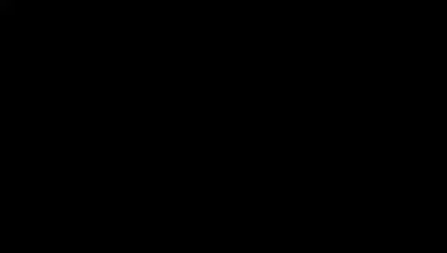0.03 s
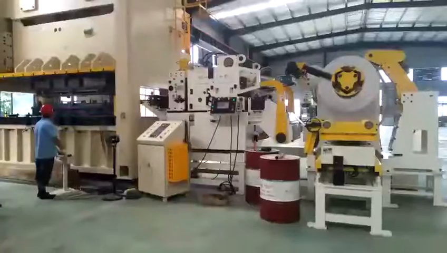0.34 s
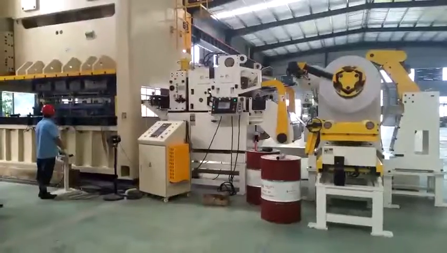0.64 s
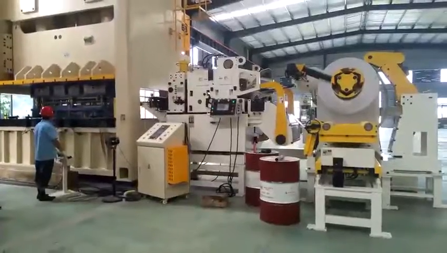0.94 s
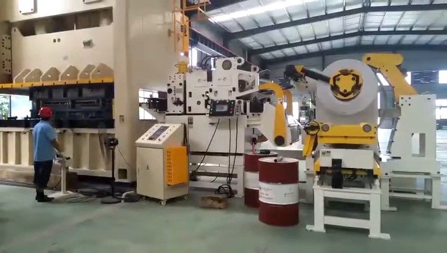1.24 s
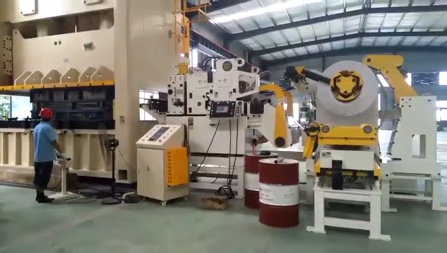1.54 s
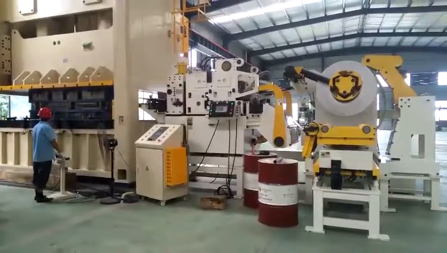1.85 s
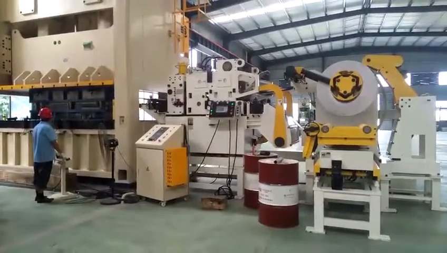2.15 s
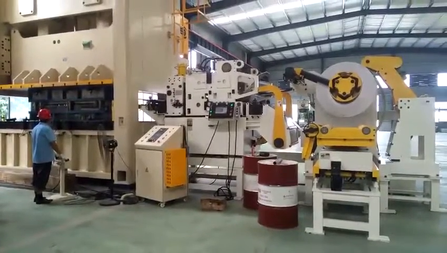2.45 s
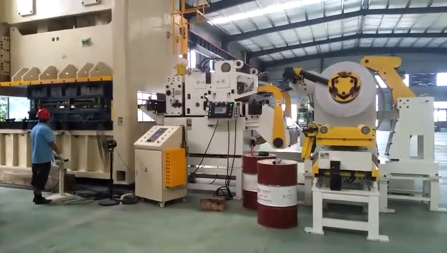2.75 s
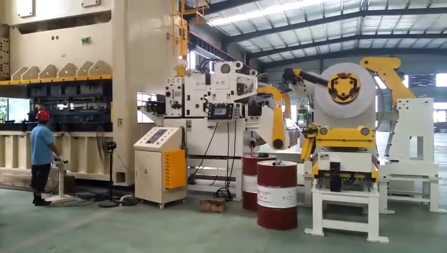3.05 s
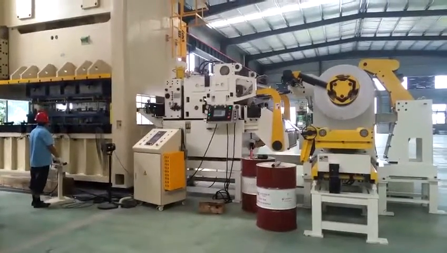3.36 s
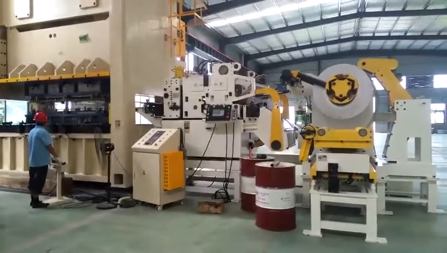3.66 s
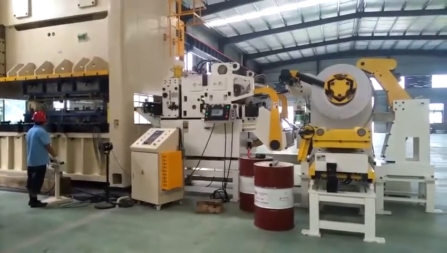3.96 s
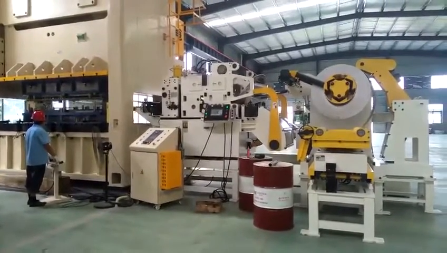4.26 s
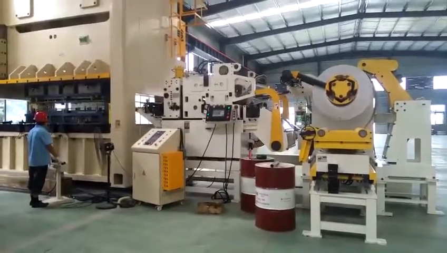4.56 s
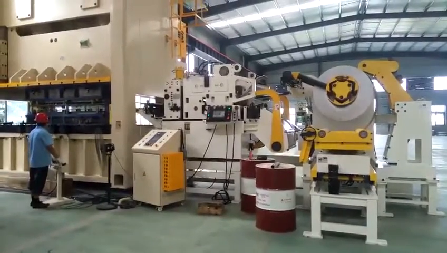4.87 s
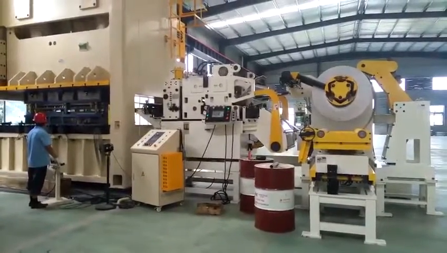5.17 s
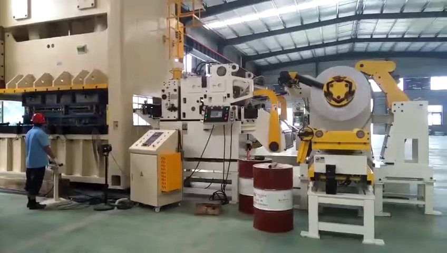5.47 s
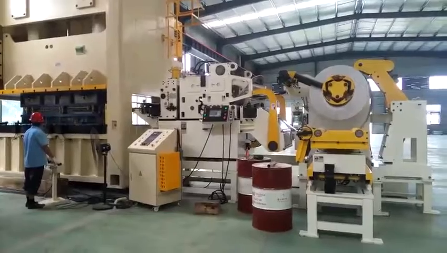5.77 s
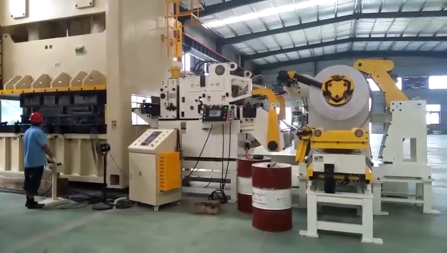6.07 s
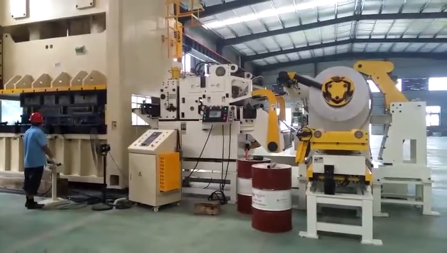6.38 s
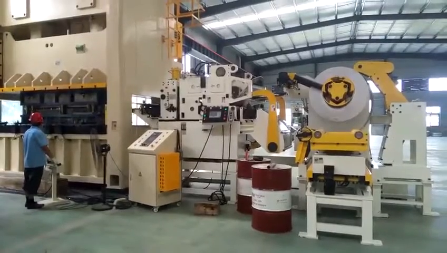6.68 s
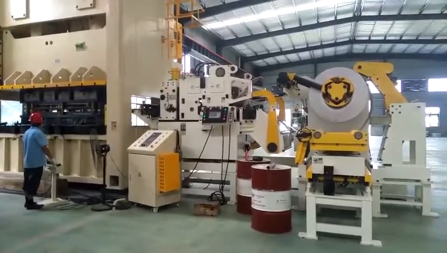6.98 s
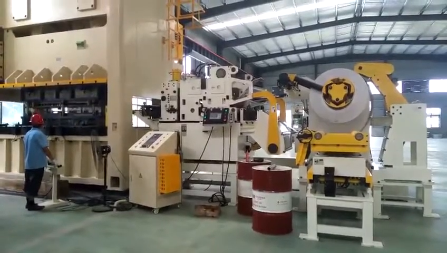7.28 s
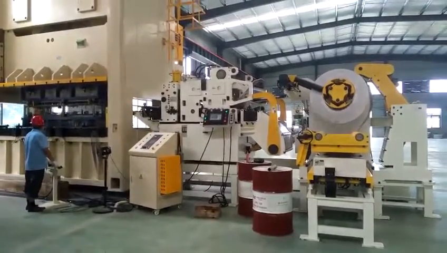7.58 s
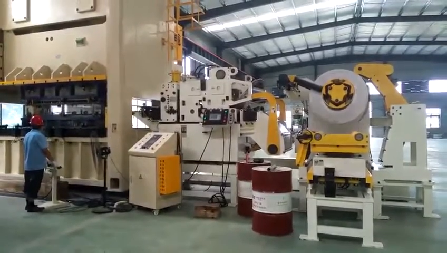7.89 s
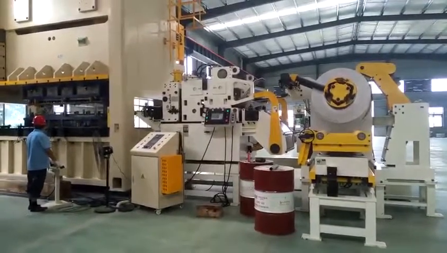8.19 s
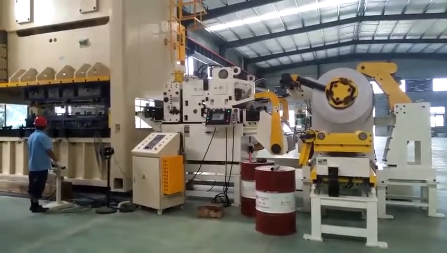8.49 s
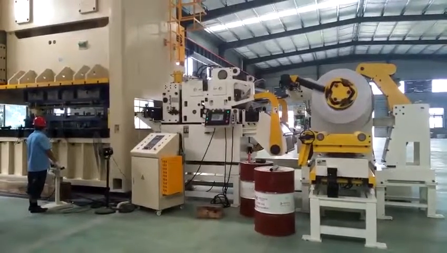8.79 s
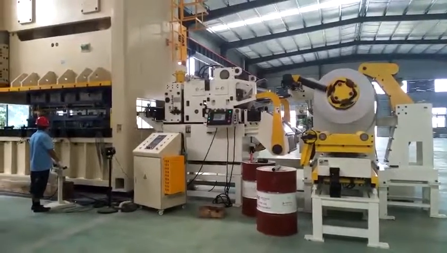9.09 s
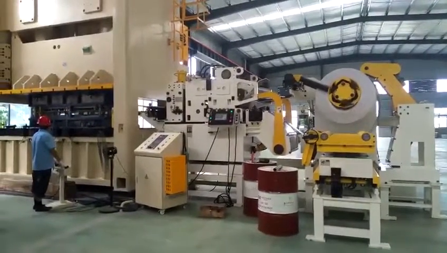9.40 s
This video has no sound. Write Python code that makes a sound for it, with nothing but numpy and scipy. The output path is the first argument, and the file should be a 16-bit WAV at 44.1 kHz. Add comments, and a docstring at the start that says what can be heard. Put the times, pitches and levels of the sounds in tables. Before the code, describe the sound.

A large metal stamping press makes two strokes, crashing and thumping with air hisses over steady fan noise in an echoing factory hall.

```python
"""A factory hall, with a small microphone on a large stamping press, nearest to its strip feeder.
Fans, motors and an inverter run throughout; farther off, another machine swishes. The press makes two
strokes: air valves blow, the clutch knocks in, the die crashes shut and shakes the frame, and the feeder
rattles new steel strip in before the brake bites. The hall rings on; the crashes overload the microphone."""
import sys
import numpy as np
from scipy import signal
from scipy.fft import rfft, irfft, next_fast_len
from scipy.io import wavfile
from scipy.ndimage import uniform_filter1d, map_coordinates

SR = 44100
rng = np.random.default_rng(int(sys.argv[2]) if len(sys.argv) > 2 else 0)


def int16_out(signal):
    """Quantize to a 16-bit WAV file."""
    q = np.round(np.clip(np.atleast_2d(signal).T, -1, 1) * 32767)
    wavfile.write(sys.argv[1], SR, q.astype(np.int16))


N = 416744
T = np.arange(N) / SR

# Levels are relative. Ventilation spectrum: f/Hz, level/dB
FAN_SPECTRUM = [(20, -55), (40, -25), (60, -1.5), (100, -4), (190, 1), (300, -7), (430, -4), (650, -10.5),
                (950, -14), (1400, -13.5), (2200, -16), (3200, -22.5), (5000, -26), (6200, -27.5),
                (7000, -70), (9000, -70), (11000, -89)]
# motor hum: f/Hz, level/dB
MOTOR_LINES = [(129.2, -55), (414.5, -57), (551, -59.5), (1378, -64)]
# inverter lines: f/Hz, level halfway through/dB, slope/(dB/s)
INVERTER_LINES = [(5458, -68, 0.3), (5543, -67, 0), (5935, -55.5, 0.7), (5981, -67, 0), (6024, -65, 0.3),
                  (6066, -56.5, -1)]
# far machine's swishes: t/s, level/dB, ring f/Hz, ring level/dB
FAR_SWISHES = [(.16, -50, 1378, -59), (.53, -50, 1378, -54), (.89, -52, 1126, -56),
               (3.78, -45.5, 1378, -56), (4.201, -50, 2165, -57), (4.545, -52, 1292, -50.5),
               (4.92, -58, 1787, -62), (8.13, -48, 2153, -60), (8.52, -52.5, 1277, -55),
               (8.92, -50.5, 2110, -59), (9.31, -50.5, 1780, -52.5)]
# their spectrum: f/Hz, level/dB
FAR_SPECTRUM = [(300, 0), (900, 1.5), (1400, -7), (2100, -4.5), (3000, -5), (4100, -2), (5500, -5),
                (6500, -28), (8000, -36)]
# far machine's metal: f/Hz, width/Hz, level/dB
FAR_MODES = [(1083, 40, -4), (1246, 45, -1.5), (1365, 60, -4), (1560, 40, -8), (1730, 45, -5),
             (2110, 45, -3), (4000, 240, -13.5), (4330, 260, -15)]
# press cycles: die meets sheet t/s, feed level/dB, feed run-down t60/s, feed treble rise/s
PRESS_STROKES = [(1.532, -18.5, 0.95, 0.27), (5.786, -21, 0.75, 0.34)]
# clutch air through its silencer: f/Hz, level/dB
SILENCER_SPECTRUM = [(200, 6), (550, 5), (680, 13.5), (850, 7.5), (1500, 9), (2200, 8), (3200, -0.5),
                     (4200, 2), (5600, -1.5), (7000, -12), (8000, -22), (9400, -20), (10500, -50)]
# clamp and brake valves blowing off: t/s, level/dB, rise/s, hold/s, t60/s
BLOW_OFFS = [(1.21, -30, 0.055, 0.08, 2.8), (5.475, -22, 0.059, 0.059, 2.1),
             (2.783, -27, 0.095, 0.049, 0.72), (7.04, -26.5, 0.025, 0.11, 0.67),
             (7.19, -29, 0.025, 0.05, 0.34)]
# open exhaust: f/Hz, level/dB
JET_SPECTRUM = [(200, 0), (550, 7.5), (680, 15), (850, 8.5), (1400, 11), (2200, 6.5), (3200, -0.5),
                (4200, 3.5), (5200, 4), (6000, 1), (7000, -9.5), (8000, -21.5), (9400, -16.5), (10500, -48)]
# brake line bleeding: t/s, level/dB, rise/s, hold/s, t60/s
BRAKE_BLEEDS = [(2.53, -34.5, 0.043, 0.41, 7.8), (6.752, -40.5, 0.063, 1, 3.6)]
# its hiss: f/Hz, level/dB
BLEED_SPECTRUM = [(200, 1.5), (550, 6), (680, 14.5), (850, 10), (1400, 9), (2200, 4), (3200, 2),
                  (4200, 2.5), (5600, 2.5), (7000, -4.5), (8000, -23), (9400, -12), (10500, -51)]
# clutch valve body: f/Hz, level/dB
VALVE_MODES = [(680, -4), (1450, -1), (1750, -2), (2150, 0), (2350, -3), (4100, -7), (5200, -8)]
# gears knocking as the clutch engages: t/s, level/dB
GEAR_KNOCKS = [(1.158, -30), (1.185, -33), (5.418, -30), (5.441, -31)]
# press frame: f/Hz, level/dB, t60/s
FRAME_MODES = [(56.2, -5, 0.99), (66.5, -3, 0.25), (79.2, 1.5, 0.35), (99.4, -5, 0.4), (123.3, 0, 0.51),
               (154.1, -4, 1.6), (190.4, 1.5, 0.54), (221.2, 6, 1.06), (257, -14.5, 0.68), (371.5, -4, 0.6)]
# booming panels: f/Hz, level/dB
PANEL_SPECTRUM = [(20, -13), (45, -19), (65, 0), (105, 1.5), (150, 2), (220, 0.5), (280, -1.5), (380, -4),
                  (480, -9), (700, -17.5), (1100, -22.5), (3000, -42), (9000, -87)]
# clanking tooling: f/Hz, level/dB
CLANK_SPECTRUM = [(100, -19.5), (400, -5), (700, 5), (1100, 1), (2200, -5), (3000, -13.5), (5000, -14),
                  (7000, -24.5), (8200, -44), (12000, -70)]
# ringing steel blocks: f/Hz, level/dB
TOOLING_MODES = [(363, 0), (417, 1), (565, -5), (635, 1), (700, -14), (955, -9), (1215, -11), (1457, -2),
                 (1725, 0), (1885, -6), (2260, -15)]
# feeder clamp gripping the strip: t/s, level/dB
CLAMP_GRIPS = [(1.221, -20), (5.475, -22), (5.566, -23.5)]
# clamp jaw: f/Hz, level/dB
JAW_MODES = [(620, -3), (860, -2), (1090, -1), (1400, -2), (1830, -3), (2150, -7)]
# strip squeaking in the clamp: t/s, f/Hz, level/dB, hold/s
STRIP_SQUEAKS = [(1.23, 4880, -42, 0.008), (1.259, 5000, -38, 0.015), (1.289, 4900, -33.5, 0.032),
                 (6.672, 4950, -34, 0.028), (6.754, 4973, -36, 0.008)]
# modes of a squeak: pitch ratio, level/dB
SQUEAK_MODES = [(1, -2), (0.8, -12), (0.7, -10)]
# ram setting off and climbing back: t/s from die contact, level/dB, thud f/Hz
RAM_JOLTS = [(-.24, -22.5, 51.7), (.455, -14, 111), (.6, -24, 75), (.7, -23, 171), (.86, -28, 84)]
# die stations striking in turn: t/s, crash/dB, thud/dB, block f/Hz, block ring/dB, snap/dB
DIE_PUNCHES = [(1.532, -14, -9, 2150, -19.5, -36.5), (1.578, -16.5, -13, 402, -14.5, -45),
               (1.616, -21, -18, 358, -10.5, -49), (1.659, -20.5, -21, 1850, -24.5, -59),
               (1.738, -15, -10, 617, -16.5, -42), (1.768, -18.5, -17, 689, -12, -33.5),
               (1.813, -17, -10, 1100, -28, -38.5), (1.878, -17, -26, 415, -21, -46),
               (1.916, -19.5, -12.5, 945, -18, -51), (1.937, -20, -19, 539.6, -13, -56),
               (5.786, -14.5, -8.5, 2224, -22.5, -35), (5.841, -18, -14, 404.5, -10.5, -46),
               (5.880, -18, -19.5, 356.7, -6.5, -41), (5.914, -20.5, -21.5, 1620, -25, -54),
               (5.940, -25, -18, 559, -17, -60), (5.992, -16, -9, 612, -13, -36),
               (6.018, -17.5, -16, 699, -13.5, -44), (6.040, -19.5, -18, 910, -23, -44),
               (6.069, -19, -7.5, 427, -20, -40), (6.112, -22, -20.5, 396, -21, -46),
               (6.140, -18, -22, 1875, -17.5, -48), (6.176, -18, -23, 568, -16, -59)]
# sheet breaking under a punch: f/Hz, level/dB
SNAP_SPECTRUM = [(1000, -34), (5000, -3.5), (8000, 2.5), (11500, -2), (12400, -9.5)]
# scraping sheet: f/Hz, level/dB
SCRAPE_SPECTRUM = [(200, -31.5), (600, -7), (1000, 13.5), (1450, 8), (2100, 1), (2900, 9.5), (4000, 7),
                   (5000, 3), (6200, 1.5), (8200, -19), (10000, -38), (12000, -69)]
# steel strip: f/Hz, width/Hz, level/dB
STRIP_MODES = [(1446, 130, 4), (2110, 340, 1.5), (2550, 140, -20), (3990, 270, -3), (4400, 220, -6.5),
               (5340, 470, -7), (5750, 300, -17)]
# rolls and guides: f/Hz, level/dB
ROLL_MODES = [(1222, -3.5), (1384, 1), (1460, 1.5), (1561, 1.5), (1865, -1.5), (1981, -1.5), (2062, 0.5),
              (2546, -4.5), (2686, -4.5), (3729, -6), (3881, -11.5), (3984, -6.5), (4102, -10.5),
              (4355, -9), (4540, -9)]
# strip slapping its guides: t/s, ring/dB, snap/dB
STRIP_SLAPS = [(1.986, -21, -42), (2.022, -22.5, -50), (2.115, -20, -38), (2.138, -22, -33.5),
               (2.285, -26, -42.5), (6.213, -26, -54), (6.238, -24, -44), (6.28, -16, -40),
               (6.344, -22, -46), (6.405, -22, -51)]
# brake ending each stroke: t/s, level/dB
BRAKE_BITES = [(2.531, -18.2), (6.750, -20.3)]
# bite, lock and rock-back: t/s after the bite, level/dB over the bite
BRAKE_KNOCKS = [(0, 0), (.056, -3.5), (.25, -14)]
# hall decay: f/Hz, t60/s
HALL_DECAY = [(60, 1.76), (170, 5.47), (500, 3.95), (1500, 2.36), (5000, 3.4), (9000, 2.07), (12000, 0.29)]
# microphone response: f/Hz, level/dB
MIC_RESPONSE = [(20, -2), (60, 0.5), (500, 1), (900, -1), (1500, 1.5), (2100, 2.5), (3000, -0.5),
                (4100, 4.5), (6100, 3), (7000, 1), (8000, -2.5), (11000, -8), (12400, -16)]


def amp(db):
    """Decibels to gain."""
    return 10 ** (np.asarray(db) / 20)


def unit(x):
    """Scale to rms 1."""
    return x / np.sqrt(np.mean(x ** 2) + 1e-20)


def along(points, hz):
    """Read (f/Hz, value) points on a log axis."""
    f, v = np.transpose(points)
    return np.interp(np.log(hz + 1), np.log(f + 1), v)


def fade(t, t60):
    """Exponential decay, 60 dB down at t60."""
    return np.exp(-np.log(1000) * t / np.maximum(t60, 1e-3))


def swell(s, db, rise_s, hold_s, t60):
    """An envelope from time s: straight rise, hold, exponential release."""
    return amp(db) * np.clip((T - s) / rise_s, 0, 1) * fade(np.maximum(T - s - rise_s - hold_s, 0), t60)


def wobble(rate):
    """A smooth random curve, rate knots a second."""
    return map_coordinates(rng.standard_normal(int(N * rate / SR) + 4), [T * rate], order=2)


def sine(t, hz):
    """A sine at a random phase."""
    return np.sin(2 * np.pi * (hz * t + rng.random(np.shape(hz))))


def filtered(x, response):
    """Filter x by a gain given as a function of frequency."""
    size = next_fast_len(len(x) + SR // 2, True)
    return irfft(rfft(x, size) * response(np.fft.rfftfreq(size, 1 / SR)), size)[:len(x)]


def noise(spectrum, size=N):
    """Coloured noise of rms 1."""
    return unit(filtered(rng.standard_normal(size), lambda hz: amp(along(spectrum, hz))))


def resonances(modes, hz):
    """Gain of a set of resonances: f/Hz, width/Hz, level/dB."""
    return np.sqrt(sum(amp(db) ** 2 / (1 + (2 * (hz - f) / width) ** 2) for f, width, db in modes))


def add(track, s, sound):
    """Mix a sound into the track at time s."""
    part = track[round(s * SR):][:len(sound)]
    part += sound[:len(part)]


def ventilation(db=-41):
    """The fans' rush of air fills the hall, its level barely moving."""
    return amp(db + 0.48 * wobble(2.2) + 0.76 * wobble(12)) * noise(FAN_SPECTRUM)


def hum(lines, unsteady_db, drift_rad):
    """A drive's steady lines waver on their way across the hall to the microphone."""
    return np.sqrt(2) * sum(amp(db + unsteady_db * wobble(7))
                            * np.sin(2 * np.pi * hz * T + drift_rad * wobble(7)) for hz, db in lines)


def inverter(blur_hz=6110, width_hz=190):
    """The switching lines slowly trade strength, blurred by the changing motor load."""
    blur = filtered(rng.standard_normal(N), lambda hz: np.exp(-.5 * ((hz - blur_hz) / width_hz) ** 2))
    lines = [(hz, db + slope * (T - T.mean())) for hz, db, slope in INVERTER_LINES]
    return amp(-5.5) * hum(lines, unsteady_db=0.5, drift_rad=1.06) + amp(-64) * unit(blur)


def far_machine(swish_s=0.083, jingle_db=2.3):
    """Far from the microphone a machine swishes; each rub rings its metal and makes one mode sing."""
    rub = lambda s: np.exp(-.5 * ((T - s) / swish_s) ** 2)
    envelope = sum(amp(db) * rub(s) for s, db, *_ in FAR_SWISHES)
    metal = unit(filtered(noise(FAR_SPECTRUM), lambda hz: resonances(FAR_MODES, hz)))
    swishes = envelope * amp(jingle_db * wobble(50)) * (amp(-3.5) * noise(FAR_SPECTRUM) + metal)
    drift = 1.2 * wobble(45)
    singing = sum(amp(db) * rub(s) * np.sin(2 * np.pi * hz * T + drift) for s, _, hz, db in FAR_SWISHES)
    return swishes + np.sqrt(2) * singing


def valves(clutch_lead_s, pilot_lead_s=0.04):
    """A pilot puffs, the clutch sputters through its silencer, valves blow off, the brake line bleeds."""
    def air(swells, spectrum, flutter_db):
        return np.linalg.norm(swells, axis=0) * amp(flutter_db * wobble(55)) * noise(spectrum)

    puffs = []
    for s, *_ in PRESS_STROKES:
        opens = s - clutch_lead_s
        puffs.append(swell(opens - pilot_lead_s, db=-41, rise_s=0.012, hold_s=0.01, t60=0.25))
        puffs.append(swell(opens, db=-28.5, rise_s=0.015, hold_s=0.024, t60=0.94))
    return (air(puffs, SILENCER_SPECTRUM, flutter_db=1.5)
            + air([swell(*row) for row in BLOW_OFFS], JET_SPECTRUM, flutter_db=1)
            + air([swell(*row) for row in BRAKE_BLEEDS], BLEED_SPECTRUM, flutter_db=1))


def clack(t, modes, t60=0.099, detune=0.05):
    """One light knock on steel: its modes ring at new strengths, a little off pitch."""
    ring = sum(amp(db + rng.normal(0, 5.8)) * sine(t, hz * np.exp(rng.normal(0, detune)))
               for hz, db in modes)
    return unit(ring) * fade(t, t60) * (1 - np.exp(-t / 0.0027))


def impact(db, thud_db, thud_hz, boom_db, boom_t60=0.56, clank_t60=0.15, ring_db=-8, rattle_db=-13):
    """A heavy contact: tooling clanks at db; relative to that, the frame thuds and its panels boom."""
    t = np.arange(2 * SR) / SR
    frame_hz, frame_db, frame_t60 = np.transpose(FRAME_MODES)[:, :, None]
    # where the load bears decides which frame modes take it up
    share = amp(frame_db) * (np.exp(-.5 * (np.log2(frame_hz / thud_hz) / 0.34) ** 2) + 0.14)
    modes = share * fade(t, frame_t60) * sine(t, frame_hz)
    thud = amp(thud_db) * modes.sum(0) / np.linalg.norm(share) * np.sqrt(2)
    boom = amp(boom_db) * noise(PANEL_SPECTRUM, len(t)) * fade(t, boom_t60)
    steel = unit(sum(amp(level + rng.normal(0, 5.1)) * sine(t, hz) for hz, level in TOOLING_MODES))
    crash = noise(CLANK_SPECTRUM, len(t)) * (fade(t, clank_t60) + amp(rattle_db) * fade(t, t60=1))
    clank = crash + amp(ring_db) * steel * fade(t, t60=0.21)
    return amp(db) * ((thud + boom) * (1 - np.exp(-t / 0.015)) + clank * (1 - np.exp(-t / 0.0043)))


def clutch(lead_s):
    """The valve spool clacks, then the clutch takes up the gears' slack with a quick double knock."""
    out, t = np.zeros(N), np.arange(SR // 4) / SR
    for s, *_ in PRESS_STROKES:
        add(out, s - lead_s, amp(-29) * clack(t, VALVE_MODES, t60=0.2, detune=0.02))
    for s, db in GEAR_KNOCKS:
        add(out, s, impact(db, thud_db=-1, thud_hz=95, boom_db=0, clank_t60=0.22, ring_db=-11))
    return out


def clamp(seat_s=0.055):
    """The feeder's jaw touches, then seats with a boom; both times its steel clacks."""
    out, t = np.zeros(N), np.arange(SR // 4) / SR
    for s, db in CLAMP_GRIPS:
        for delay, boom_db in (0, -15), (seat_s, -3):
            knock = impact(db, thud_db=-12, thud_hz=212, boom_db=boom_db, boom_t60=0.99, ring_db=-9)
            add(out, s + delay, knock)
            add(out, s + delay, amp(db - 2) * clack(t, JAW_MODES, t60=0.1, detune=0.03))
    return out


def squeaks(jitter_rad=0.4, rough_db=0.5):
    """The strip sticks and slips in the clamp: short rough squeaks in three modes."""
    out, t = np.zeros(N), np.arange(SR // 4) / SR
    slip = lambda: unit(uniform_filter1d(rng.standard_normal(len(t)), SR // 500))
    for s, hz, db, hold_s in STRIP_SQUEAKS:
        squeal = sum(amp(level - rough_db * slip())
                     * np.sin(2 * np.pi * hz * ratio * t + jitter_rad * slip())
                     for ratio, level in SQUEAK_MODES)
        envelope = np.minimum(t / 0.0045, 1) * fade(np.maximum(t - hold_s, 0), t60=0.12)
        add(out, s, amp(db) * unit(squeal) * envelope)
    return out


def ram(lead_s=0.5):
    """The ram jolts the frame dully as it sets off and climbs back, alike in each stroke."""
    jolts, out = np.zeros(4 * SR), np.zeros(N)
    for s, db, hz in RAM_JOLTS:
        add(jolts, lead_s + s, impact(db - 9.5, thud_db=9.5, thud_hz=hz, boom_db=8.5))
    for s, *_ in PRESS_STROKES:
        add(out, s - lead_s, jolts)
    return out


def die_block(t, hz, split=0.0437):
    """The struck die block rings in a close pair of modes."""
    pair = sine(t, hz) + amp(-7) * sine(t, hz * (1 + split))
    return unit(pair) * fade(t, t60=0.13) * (1 - np.exp(-t / 0.0053))


def snap(t, db):
    """A short bright crack of thin steel."""
    return amp(db) * noise(SNAP_SPECTRUM, len(t)) * fade(t, t60=0.31) * (1 - np.exp(-t / 0.0043))


def die(rattle_s=0.42):
    """The punches crash and snap through the sheet one after another, and loose die plates rattle."""
    out, t = np.zeros(N), np.arange(SR // 2) / SR
    for s, db, thud_db, ring_hz, ring_db, snap_db in DIE_PUNCHES:
        add(out, s, amp(ring_db) * die_block(t, ring_hz) + snap(t, snap_db))
        add(out, s, impact(db, thud_db - db, thud_hz=83, boom_db=1.5,
                           clank_t60=0.14, ring_db=-3.5, rattle_db=-15.5))
    for s, *_ in PRESS_STROKES:
        for delay in rattle_s * rng.random(size=12):
            add(out, s + delay, amp(-27.5) * clack(t, TOOLING_MODES))
    return out


def feeder(start_s=0.34, rise_s=0.2, hold_s=0.17, treble_hz=2900, top_hz=7460, roll_width_hz=16):
    """The strip chatters through the rolls; sheet and rolls ring with it, brightest at full speed."""
    t = np.arange(SR // 4) / SR
    rasp = amp(2.3 * wobble(130))
    chatter = lambda: rasp * rng.standard_normal(N)

    def ringing(modes):
        return unit(filtered(chatter(), lambda hz: resonances(modes, hz) / (1 + (hz / top_hz) ** 10)))

    # the scrape sounds through the sheet's countless close modes
    sheet = noise(SCRAPE_SPECTRUM, len(t)) * fade(t, t60=0.065)
    scrape = unit(signal.fftconvolve(chatter(), sheet)[:N])
    # as the contact wanders, two sets of roll modes swell and sink by turns
    shift = amp(3 * wobble(16))
    modes = [(hz, roll_width_hz, db) for hz, db in ROLL_MODES]
    rolls = unit((shift * ringing(modes[::2]) + ringing(modes[1::2]) / shift) / np.hypot(shift, 1 / shift))
    feed = amp(-6) * scrape + amp(-3.5) * (ringing(STRIP_MODES) + rolls)
    body = filtered(feed, lambda hz: 1 / (1 + (hz / treble_hz) ** 10))
    out = np.zeros(N)
    for s, db, t60, treble_rise_s in PRESS_STROKES:
        out += body * swell(s + start_s, db, rise_s, hold_s, t60)
        out += (feed - body) * swell(s + start_s, db, treble_rise_s, rise_s + hold_s - treble_rise_s, t60)
    return out


def slaps():
    """Each slap of the strip cracks and sets the rolls and guides ringing."""
    out, t = np.zeros(N), np.arange(SR // 2) / SR
    for s, ring_db, snap_db in STRIP_SLAPS:
        add(out, s, amp(ring_db) * clack(t, ROLL_MODES, t60=0.26, detune=0.0067) + snap(t, snap_db))
    return out


def brake():
    """The brake stops the ram at the top of each stroke: it bites, locks, and the drive rocks back."""
    out = np.zeros(N)
    for s, bite_db in BRAKE_BITES:
        for delay, knock_db in BRAKE_KNOCKS:
            add(out, s + delay, impact(bite_db + knock_db, thud_db=-7.5, thud_hz=110, boom_db=2.5,
                                       clank_t60=0.18, ring_db=-6.5))
    return out


def hall(x, build_s=0.0082):
    """The big hall's reverberation builds, then dies away, longest in the low notes."""
    hz, t, bands = signal.stft(rng.standard_normal(3 * SR), SR, nperseg=1024)
    envelope = fade(t, along(HALL_DECAY, hz)[:, None]) * (1 - np.exp(-t / build_s))
    tail = signal.istft(bands * envelope, SR, nperseg=1024)[1]
    return signal.fftconvolve(x, tail / np.linalg.norm(tail))[:N]


def scene(clutch_lead_s=0.554, hall_db=-8, feeder_send=0.7):
    """The press line in its hall; the feeder stands nearest the microphone and so sounds drier."""
    background = ventilation() + hum(MOTOR_LINES, unsteady_db=3.2, drift_rad=0.91) + inverter()
    press = amp(-4) * valves(clutch_lead_s) + clutch(clutch_lead_s) + clamp() + ram() + die() + brake()
    strip = feeder() + slaps()
    reverb = amp(hall_db) * hall(press + feeder_send * strip)
    return (background + far_machine() + press + squeaks() + strip + reverb)[None]


def record(dry, limit_db=-14.5, follow_s=0.0066, ceiling=0.31, hardness=6, start_s=0.12, top_hz=12400):
    """Gain control turns the crashes down, the input flattens the rest, the microphone colours it all."""
    def microphone(hz):
        """The response as a causal, minimum-phase filter."""
        cepstrum = irfft(np.log(amp(along(MIC_RESPONSE, hz))))
        half = len(cepstrum) // 2
        return np.exp(rfft(cepstrum * np.r_[1, np.full(half - 1, 2), np.zeros(half)]))

    step = 1 / int(follow_s * SR)
    power = signal.lfilter([step], [1, step - 1], dry[0] ** 2)
    limited = dry[0] * np.minimum(1, amp(limit_db) / np.sqrt(np.abs(power) + 1e-12))
    clipped = limited / (1 + np.abs(limited / ceiling) ** hardness) ** (1 / hardness)
    fade_in = np.clip((T - start_s) / 0.004, 0, 1)
    return filtered(clipped * fade_in, lambda hz: microphone(hz) * (hz < top_hz))[None]


dry = scene()
out = record(dry)
int16_out(out)
```